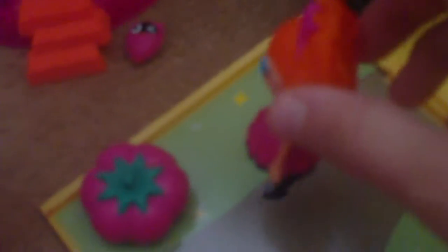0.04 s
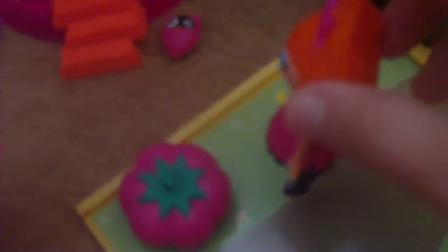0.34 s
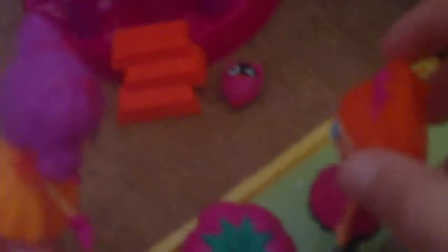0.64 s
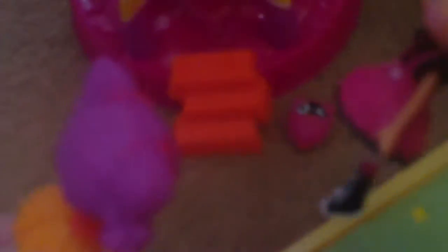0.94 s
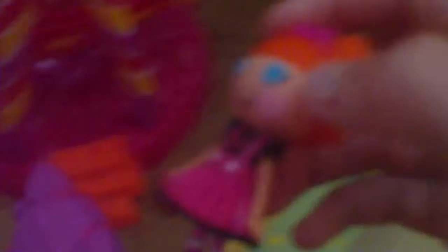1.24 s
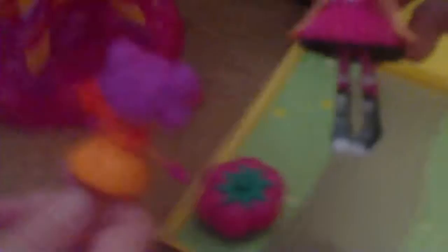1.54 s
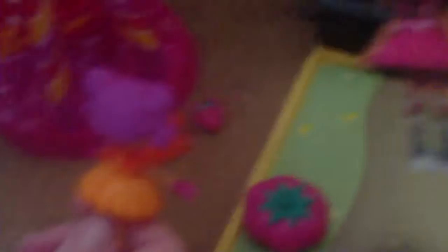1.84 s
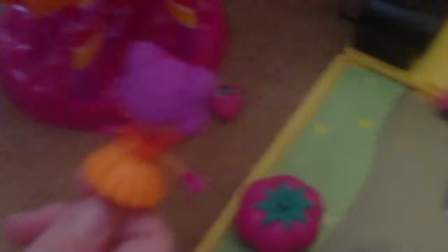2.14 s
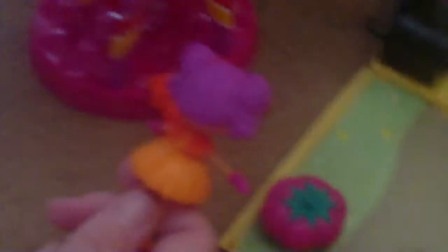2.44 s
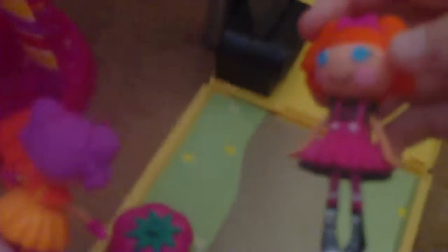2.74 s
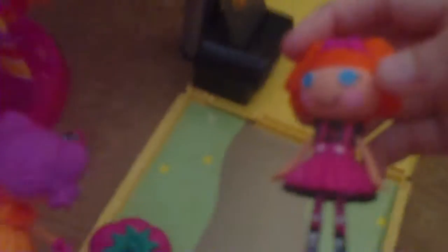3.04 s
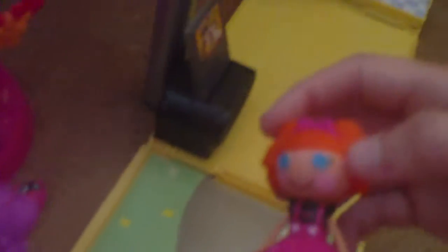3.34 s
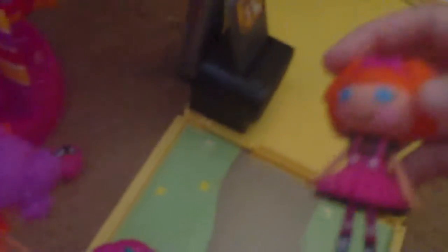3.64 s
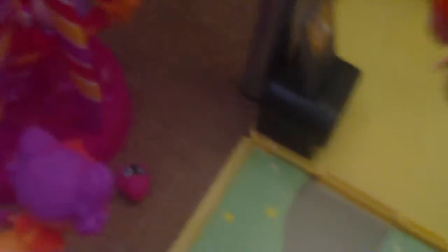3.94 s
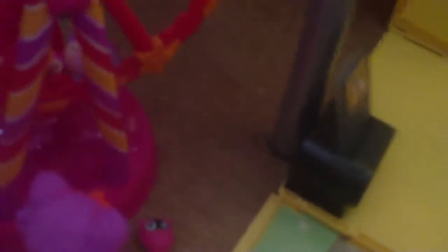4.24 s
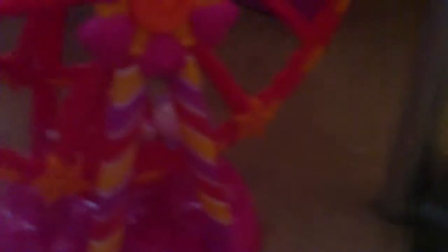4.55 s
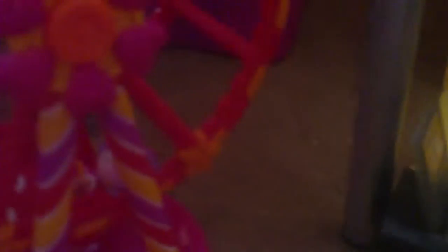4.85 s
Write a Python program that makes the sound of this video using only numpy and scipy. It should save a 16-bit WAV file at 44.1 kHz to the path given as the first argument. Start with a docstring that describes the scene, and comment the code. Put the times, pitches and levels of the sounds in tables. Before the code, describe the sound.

Fingertips rub softly on little plastic dolls, which now and then click and knock against a plastic ride. Toward the end, closer and louder handling noise takes over: taps on the camera body, a short groan of gripping skin, then stuttering creaks with a few sharp snaps from the case. The small room is otherwise quiet, and the microphone hisses throughout.

```python
"""A quiet room; the microphone hisses throughout. For the first 3.6 s small plastic dolls are handled
and set on a toy ride: light knocks, shell clicks, faint rubbing. From 3.7 s the hand shifts on the
camera: fingers tap the case and skin slides over it. From 4.2 s stick-slip of the grip groans, then
creaks in slowing runs of slips, with single jerks and a few sharp snaps of the case joints."""
import sys
import numpy as np
from scipy import signal
from scipy.fft import rfft, irfft, next_fast_len
from scipy.io import wavfile
from scipy.ndimage import map_coordinates

SR = 44100
rng = np.random.default_rng(int(sys.argv[2]) if len(sys.argv) > 2 else 0)


def unload_audio(sound):
    """Save the sound as a 16-bit wav file, at the path given as the first command line argument."""
    columns = np.transpose(np.atleast_2d(sound))
    # keep every value between -1 and 1, then stretch to whole-number steps
    steps = np.round(np.clip(columns, -1, 1) * 32767)
    wavfile.write(sys.argv[1], SR, steps.astype(np.int16))


N = 224148
TIME_S = np.arange(N) / SR
AGE_S = np.arange(SR // 8) / SR  # time since a blow

# low modes of the camera case, modes of a doll's shell: (frequency [Hz], level [dB], t60 [s])
CASE_LOW_MODES = [(101.2, -16, 0.053), (169, -11, 0.04), (268, -2.5, 0.031), (348.5, -4, 0.057)]
SHELL_MODES = [(1370, -19, 0.018), (2810, 0, 0.0089), (4310, 0, 0.011), (4800, -3, 0.011),
               (7020, -11.5, 0.017), (9400, 0.5, 0.0036)]
# spectra of struck and rubbed plastic: (frequency [Hz], level [dB])
PLASTIC_CRACK = [(1200, -15.5), (2600, 4.5), (3600, -1.5), (4600, -14), (5600, 3), (7000, 3.5),
                 (10000, -16), (15000, -14)]
PLASTIC_RUB = [(150, -12), (300, -2), (800, -3.5), (1000, -4.5), (1250, -2), (1750, -7), (3000, -30)]


def amp(db):
    """Decibels to gain."""
    return 10 ** (np.asarray(db) / 20)


def unit(x):
    """Scale to rms 1."""
    return x / np.sqrt(np.mean(x ** 2) + 1e-20)


def burst(x):
    """Scale a blow to the energy of 10 ms at rms 1."""
    return x / np.sqrt(np.sum(x ** 2) / (SR / 100) + 1e-20)


def noise(spectrum, size=N):
    """Noise of rms 1 from rows of (frequency [Hz], level [dB])."""
    knots_hz, db = np.transpose(spectrum)
    hz = np.fft.rfftfreq(size, 1 / SR) + 1
    skirts = np.minimum(1, hz / knots_hz[0]) ** 2 * np.minimum(1, knots_hz[-1] / hz) ** 2
    gain = amp(np.interp(np.log(hz), np.log(knots_hz), db)) * skirts
    return unit(irfft(gain * np.exp(2j * np.pi * rng.random(len(hz))), size))


def wobble(rate_hz):
    """Smooth random curve."""
    return map_coordinates(rng.standard_normal(int(N * rate_hz / SR) + 4), [TIME_S * rate_hz])


def add(track, at_s, sound):
    """Mix a sound in."""
    part = track[max(0, round(at_s * SR)):][:len(sound)]
    part += sound[:len(part)]


def fade(t60_s, attack_s):
    """Quick rise, exponential fall."""
    return amp(-60 * AGE_S / t60_s) * (1 - np.exp(-AGE_S / attack_s))


def ring(modes, scatter_db, detune, attack_s):
    """Struck modes; strength and pitch vary from blow to blow."""
    out = 0
    for k, (hz, db, t60_s) in enumerate(modes):
        level_draw, pitch_draw = rng.standard_normal(2)
        tone = np.sin(2 * np.pi * hz * (1 + detune * pitch_draw) * AGE_S)
        out += (-1) ** k * amp(db + scatter_db * level_draw) * fade(t60_s, attack_s) * tone
    return burst(out)


def crack(spectrum, t60_s, attack_s):
    """Short puff of dense, unresolved modes."""
    return burst(noise(spectrum, size=len(AGE_S)) * fade(t60_s, attack_s))


def strokes(rows, attack_s, release_s):
    """One gain per level column: each friction stroke speeds up, holds, dies away."""
    gains = 0
    for start_s, length_s, *levels_db in rows:
        rise = np.clip((TIME_S - start_s) / attack_s, 0, 1)
        fall = np.exp(-np.maximum(TIME_S - start_s - length_s, 0) / release_s)
        gains = np.maximum(gains, amp(levels_db)[:, None] * rise * fall)
    return gains


def slip(thump_db, knock_db, crack_db):
    """One slip of the grip thumps the case, rings its panels and cracks in the treble."""
    # case modes: (frequency [Hz], level [dB], t60 [s])
    mid_modes = [(595, -3, 0.0205), (887, 4.5, 0.028), (1057, -1, 0.031), (1320, 3, 0.017),
                 (1774, -14.5, 0.022), (2424, -10, 0.017), (3040, -12.5, 0.019)]
    high_modes = [(2420, -1, 0.013), (2570, -7, 0.021), (3130, -4, 0.015), (4270, -0.5, 0.0075),
                  (5580, 0.5, 0.0045), (6000, -10, 0.0043), (6960, -14, 0.016), (7770, -6, 0.0052),
                  (9900, -12, 0.0057)]
    # crack spectrum: (frequency [Hz], level [dB])
    spectrum = [(800, 1), (1800, 13), (3000, -1), (4500, -15), (6000, 4), (8000, 4), (10500, -6),
                (15000, -21)]
    thump = ring(CASE_LOW_MODES, scatter_db=3.5, detune=0.0304, attack_s=0.00056)
    knock = ring(mid_modes, scatter_db=2.5, detune=0.025, attack_s=0.0004)
    edge = ring(high_modes, scatter_db=6.5, detune=0.016, attack_s=0.00016)
    edge += amp(-2.5) * crack(spectrum, t60_s=0.007, attack_s=0.000082)
    return amp(thump_db) * thump + amp(knock_db) * knock + amp(crack_db) * edge


def grip_creak():
    """Stick-slip on the case: runs of slips with lengthening gaps, and single jerks."""
    # runs: (start [s], end [s], mean rate [Hz], slowing [share], easing [0-1],
    # thump [dB], knock [dB], crack [dB])
    runs = [(4.362, 4.406, 120, 0.042, 1, -48.5, -42.5, -64),
            (4.684, 4.8005, 94, .085, 0.77, -30, -30.5, -34.5), (4.85, 4.8996, 41, 0.015, 0, -27, -31, -54)]
    # cut at a run's ends at full easing: (thump [dB], knock [dB], crack [dB])
    ease_db = (5.5, 4.5, 5.5)
    # lone slips: (time [s], thump [dB], knock [dB], crack [dB])
    jerks = [(4.3019, -41, -45, -61), (4.3088, -44.5, -62, -67), (4.3516, -43, -49, -61),
             (4.566, -37.5, -32, -36.5), (4.6216, -45, -37, -42), (4.629, -43, -34.5, -32.5),
             (4.6764, -40, -32, -58), (4.7173, -38, -32.5, -40), (4.808, -30, -44, -72),
             (4.821, -29, -40, -66), (4.8286, -33.5, -36, -40), (4.949, -33.5, -46, -68),
             (4.8692, -30, -56, -68), (4.957, -33.5, -61, -73), (5.051, -22, -27, -41.5),
             (5.062, -31, -38, -68)]
    jitter_s, scatter_db = 0.0004, 1
    out = np.zeros(N)
    for start_s, end_s, rate_hz, slowing, easing, *levels_db in runs:
        span_s = end_s - start_s
        for u in np.linspace(0, 1, round(span_s * rate_hz) + 1):
            at_s = start_s + span_s * (u - slowing * u * (1 - u)) + jitter_s * rng.standard_normal()
            cut_db = easing * (2 * u - 1) ** 8 * np.array(ease_db)
            slip_db = np.array(levels_db) - cut_db + scatter_db * rng.standard_normal()
            add(out, at_s, slip(*slip_db))
    for at_s, *levels_db in jerks:
        add(out, at_s, slip(*levels_db))
    return out


def joint_snaps():
    """A loaded case joint lets go all at once."""
    # snaps: (time [s], crack [dB], ring [dB], thump [dB])
    snaps = [(4.5815, -37, -60, -47), (4.635, -41, -31.5, -44), (4.7958, -25.5, -56, -32),
             (4.9254, -21, -22, -32.5)]
    # joint modes: (frequency [Hz], level [dB], t60 [s])
    modes = [(1770, 7, 0.015), (2440, 4.4, 0.02), (1300, 1, 0.019)]
    # crack spectrum: (frequency [Hz], level [dB])
    spectrum = [(700, -10), (2000, -8.5), (3300, -9.5), (4400, -5.5), (6700, -7), (8000, -17.5),
                (10000, -24.5), (15000, -26)]
    out = np.zeros(N)
    for at_s, crack_db, ring_db, thump_db in snaps:
        joint = amp(ring_db) * ring(modes, scatter_db=5, detune=0.006, attack_s=0.0017)
        thump = amp(thump_db) * ring(CASE_LOW_MODES, scatter_db=2.5, detune=0.011, attack_s=0.001)
        edge = amp(crack_db) * crack(spectrum, t60_s=0.0074, attack_s=0.00032)
        add(out, at_s, joint + thump + edge)
    return out


def skin_slides():
    """Skin friction, carried through the case to the microphone; a firm grip rumbles."""
    # slides: (start [s], length [s], rumble [dB], body [dB], hiss [dB])
    slides = [(3.718, 0.053, -60, -44, -52), (3.765, 0.032, -63, -44, -63),
              (3.87, 0.033, -56.5, -50.5, -68), (3.992, 0.054, -55, -44, -47),
              (4.045, .05, -53, -47, -46.5), (4.16, 0.025, -46.5, -50.5, -62),
              (4.242, 0.02, -60, -46, -54.5), (4.37, 0.07, -56, -57, -66), (4.495, 0.048, -48, -54, -58),
              (4.525, 0.282, -42, -38.5, -51), (4.612, 0.027, -44, -36.5, -43),
              (4.685, 0.06, -44, -42, -53), (4.8, 0.051, -36.5, -47.5, -59), (4.86, 0.26, -61, -57, -64),
              (5.018, 0.019, -48, -49, -48.5)]
    # friction spectra: (frequency [Hz], level [dB])
    low = [(90, -13), (170, -6), (290, 1), (370, -0.5), (470, -12.5), (700, -3), (1000, -17)]
    mid = [(300, -6), (470, -16), (800, -10.5), (1030, 11.5), (1400, 0.5), (1900, 2.5), (2600, -6.5),
           (3150, -2.5), (3800, -18), (5000, -16.5)]
    high = [(2060, -5.5), (3500, -2.5), (4100, -6), (5230, -9), (5630, -1.5), (6710, -2.5), (7220, -5.5),
            (10000, -10.5), (15000, -24)]
    rumble, body, hiss = strokes(slides, attack_s=0.013, release_s=0.015)
    grain = unit(amp(1.6 * wobble(300)))
    return grain * (rumble * noise(low) + body * noise(mid) + hiss * noise(high))


def finger_groan():
    """Fast stick-slip under a firm grip merges into a low, unsteady tone."""
    # contour: (time [s], pitch [Hz], level [dB])
    contour = [(4.163, 247, -49), (4.193, 250, -48.5), (4.243, 222.8, -47.5), (4.297, 226, -46.5),
               (4.319, 245.7, -48), (4.353, 232.3, -45), (4.44, 266, -60.5)]
    at_s, hz, db = np.transpose(contour)
    pitch_hz = np.interp(TIME_S, at_s, hz) * (1 + 0.0245 * wobble(130))
    phase = 2 * np.pi * np.cumsum(pitch_hz) / SR
    tone = np.sin(phase) + amp(-24) * np.sin(2 * phase) + amp(-12.5) * np.sin(3 * phase)
    rough = noise([(100, -20), (280, 4), (700, 2), (1200, -8)])
    gate = np.clip(1 + np.minimum(TIME_S - at_s[0], at_s[-1] - TIME_S) / 0.03, 0, 1)
    return gate * amp(np.interp(TIME_S, at_s, db)) * (amp(0.5) * unit(tone) + amp(-4) * rough)


def contacts(rows, rise_cycles, tone_db, rattle_db, thump_trim_db, crack_trim_db):
    """Light blows on plastic: one damped main mode, a brief rattle, a thump, a crack."""
    thump_modes = [(240, 0, 0.028), (370, -7, 0.012), (520, -7, 0.012)]
    out = np.zeros(N)
    for at_s, hz, ring_db, thump_db, crack_db in rows:
        rise = AGE_S / (rise_cycles / hz + 0.0001)  # low blows build up longer
        tone = burst(np.sin(2 * np.pi * hz * AGE_S) * rise ** 2 * np.exp(-rise))
        band = [(hz / 2, -16), (hz, 0), (hz * 1.4, -4), (hz * 2.7, -17)]
        rattle = crack(band, t60_s=0.028, attack_s=0.0003)
        body = amp(ring_db) * (amp(tone_db) * tone + amp(rattle_db) * rattle)
        thump = ring(thump_modes, scatter_db=1, detune=0.02, attack_s=0.001)
        edge = crack(PLASTIC_CRACK, t60_s=0.012, attack_s=0.00021)
        blow = body + amp(thump_db + thump_trim_db) * thump + amp(crack_db + crack_trim_db) * edge
        add(out, at_s, blow)
    return out


def finger_taps():
    """A finger strikes the camera case."""
    # taps: (time [s], pitch [Hz], ring [dB], thump [dB], crack [dB]), before trims
    taps = [(3.7305, 1400, -53.5, -57, -56), (3.986, 920, -45, -39.5, -56), (4.035, 1330, -32.5, -59, -46),
            (4.0418, 1550, -29.5, -70, -38), (4.1078, 1250, -42, -46, -64),
            (4.1293, 496, -30.5, -33.5, -71), (4.152, 1070, -24, -37.5, -53), (4.157, 533, -32, -68, -66)]
    return contacts(taps, rise_cycles=0.34, tone_db=0, rattle_db=-6.5,
                    thump_trim_db=-2.5, crack_trim_db=-0.8)


def toy_knocks():
    """Dolls strike the ride."""
    # knocks: (time [s], pitch [Hz], ring [dB], thump [dB], crack [dB]), before trims
    knocks = [(0.2555, 713, -41.5, -55, -64), (0.5846, 1380, -32.5, -43, -47.5),
              (0.6175, 1190, -40, -51, -48.5), (1.1545, 830, -49.5, -55, -52),
              (2.4075, 1410, -47.5, -69, -61)]
    return contacts(knocks, rise_cycles=0.48, tone_db=-1.6, rattle_db=-4.5,
                    thump_trim_db=-1, crack_trim_db=0)


def doll_clicks():
    """A hard contact rings a doll's thin shell; each click has its own brightness."""
    # clicks: (time [s], level [dB], tilt [dB/octave])
    clicks = [(1.1815, -37, 10.5), (1.2119, -55.5, 10), (2.138, -53, -4), (2.2807, -55.5, 3),
              (2.663, -56, -20), (3.2615, -45, -1)]
    lowest_hz = SHELL_MODES[0][0]
    out = np.zeros(N)
    for at_s, level_db, tilt in clicks:
        modes = [(hz, db + tilt * np.log2(hz / lowest_hz), t60_s) for hz, db, t60_s in SHELL_MODES]
        shell = ring(modes, scatter_db=1.5, detune=0.01, attack_s=0.0003)
        body = amp(-9.5) * crack(PLASTIC_RUB, t60_s=0.055, attack_s=0.00021)
        edge = amp(-3) * crack(PLASTIC_CRACK, t60_s=0.0037, attack_s=0.00017)
        add(out, at_s, amp(level_db) * (shell + edge + body))
    return out


def shell_scuffs():
    """Friction swells and fades in one narrow resonance of hollow plastic."""
    # scuffs: (centre [s], length [s], resonance [Hz], level [dB])
    scuffs = [(0.8, 0.081, 4300, -54.5), (1.488, 0.11, 468, -56), (1.588, 0.064, 500, -51),
              (1.668, 0.12, 518, -53.5), (1.784, 0.72, 508, -65.5), (1.878, 0.024, 4200, -57.5),
              (1.924, 0.058, 1167, -55.5), (2.323, .13, 1190, -59.5), (2.467, 0.14, 10900, -63.5),
              (2.721, 0.022, 1200, -50.5), (4.573, 0.044, 597, -35), (4.644, 0.043, 565, -34)]
    out = np.zeros(N)
    for centre_s, length_s, hz, db in scuffs:
        swell = np.cos(np.pi * np.clip((TIME_S - centre_s) / length_s, -0.5, 0.5))
        band = [(hz * 0.65, -26), (hz * 1.026, -8), (hz, 0), (hz * 0.924, -8), (hz * 1.25, -26)]
        out += amp(db) * swell * noise(band)
    return out


def doll_rubs():
    """Fingertips slide on the dolls and now and then catch, ticking the shell."""
    # rubs: (start [s], length [s], rub [dB], hiss [dB])
    rubs = [(0.725, .055, -62, -58.5), (0.772, 0.042, -55, -54.5), (1.12, 0.099, -57.5, -58),
            (1.2, 0.088, -53, -56), (1.325, 0.054, -53, -57.5), (1.56, 0.39, -64.5, -66.5),
            (1.66, 0.053, -62, -56), (1.852, 0.025, -55.5, -60), (2.275, 0.067, -62.5, -61.5),
            (2.42, 0.11, -60.5, -59.5), (2.59, 0.25, -61, -61), (2.75, 0.214, -63, -62.5),
            (2.97, 0.11, -61, -61), (3.1, 0.2, -64.5, -67), (3.595, 0.031, -61, -60.5)]
    # hiss spectrum: (frequency [Hz], level [dB])
    spectrum = [(1500, -13), (2600, 4), (3300, 0.5), (4400, -4), (5300, -2.5), (7000, 2), (9500, -6.5),
                (15000, -20)]
    catch_rate_hz = 45
    rub, hiss = strokes(rubs, attack_s=0.012, release_s=0.019)
    grain = unit(amp(2.9 * wobble(200) + 0.38 * wobble(40.26)))
    catches = (rng.random(N) < catch_rate_hz / SR) * rng.random(N)
    tick = ring(SHELL_MODES, scatter_db=1.5, detune=0.016, attack_s=0.00023)
    ticks = unit(signal.fftconvolve(catches, tick)[:N])
    return grain * (rub * noise(PLASTIC_RUB) + hiss * noise(spectrum)) + amp(-11.5) * hiss * ticks


def room_echo(x):
    """Short tail of a small furnished room."""
    tail = crack([(150, 2.5), (1000, -4), (6000, -18), (14000, -8)], t60_s=0.12, attack_s=0.00067)
    return signal.fftconvolve(x, tail / np.linalg.norm(tail))[:N]


def background():
    """Room rumble; microphone hiss with a hump near 7 kHz."""
    # spectra: (frequency [Hz], level [dB])
    rumble = [(12, -9), (20, -1.5), (80, -3), (149, -9.5), (226, -8), (367, -9), (806, -10), (1470, -12.5),
              (5000, -21), (6500, -41), (11000, -120)]
    hiss = [(3000, -13), (4200, -7.5), (6100, -4.5), (6600, 3), (7700, 1.5), (8300, -5), (11000, -6.5),
            (15000, -8.5)]
    return amp(-60) * noise(rumble) + amp(-61.5) * noise(hiss)


def scene():
    """Toys sound through the air; the grip sounds through the case, with less echo."""
    toys = doll_clicks() + toy_knocks()
    grip = finger_taps() + grip_creak() + joint_snaps() + skin_slides() + finger_groan()
    mix = toys + amp(-17.5) * room_echo(toys) + doll_rubs() + shell_scuffs()
    mix += grip + amp(-25.5) * room_echo(grip) + background()
    return mix[None]


def record(dry):
    """The camera's steep band limit."""
    cutoff_hz = 15500
    size = next_fast_len(N + SR // 4)
    hz = np.fft.rfftfreq(size, 1 / SR)
    return irfft(rfft(dry, size) / np.sqrt(1 + (hz / cutoff_hz) ** 200), size)[:, :N]


dry = scene()
out = record(dry)
unload_audio(out)
```